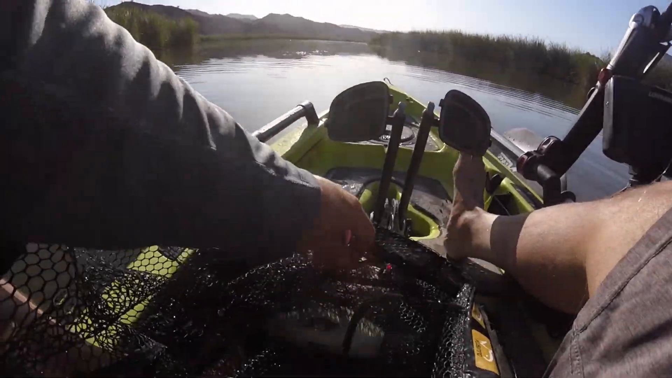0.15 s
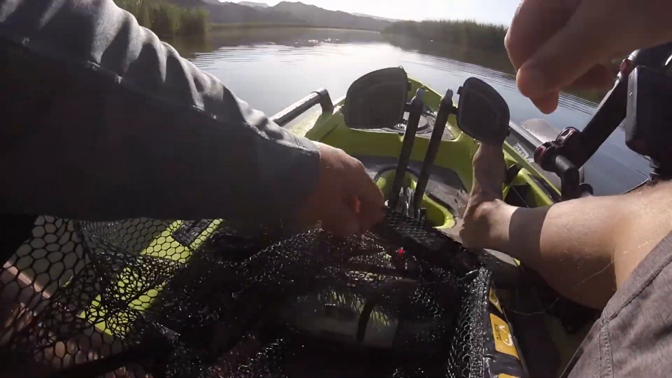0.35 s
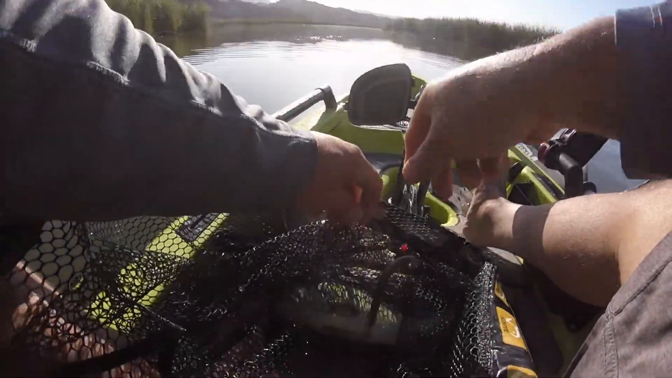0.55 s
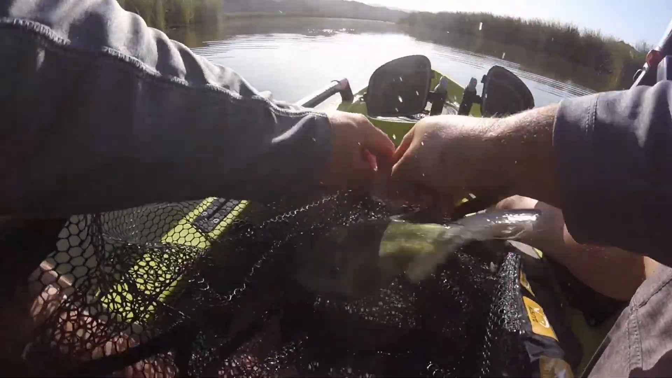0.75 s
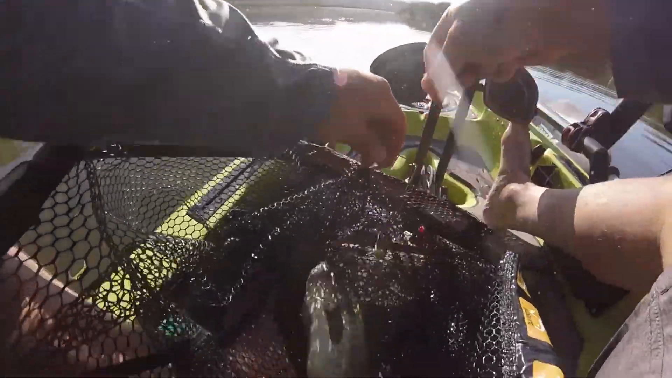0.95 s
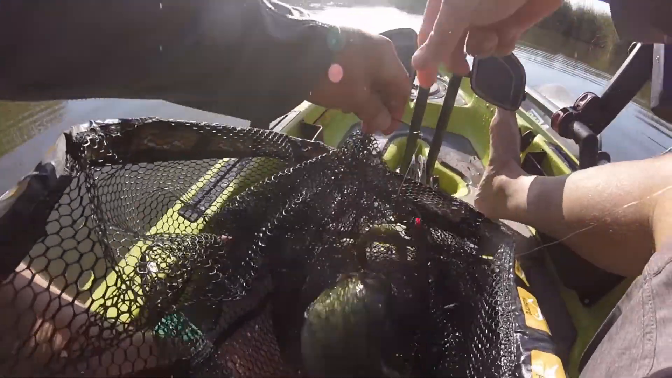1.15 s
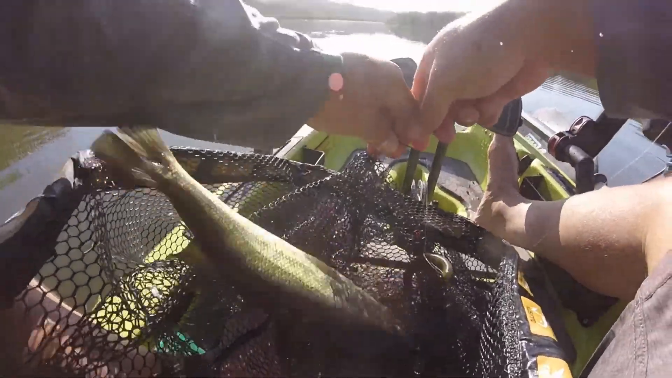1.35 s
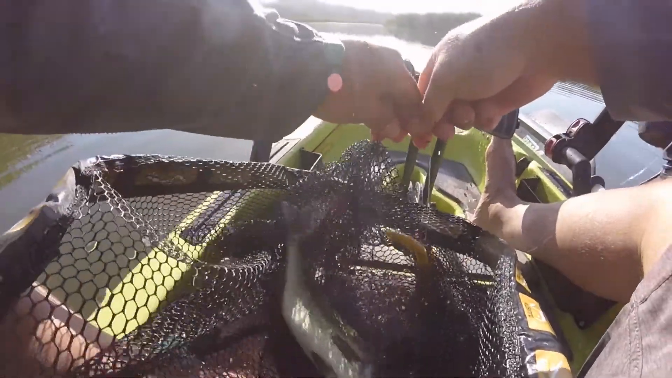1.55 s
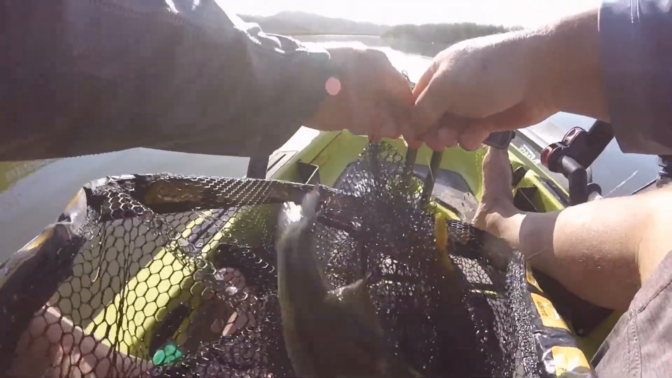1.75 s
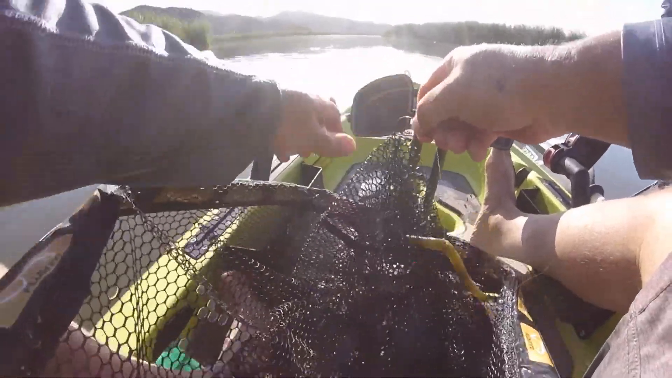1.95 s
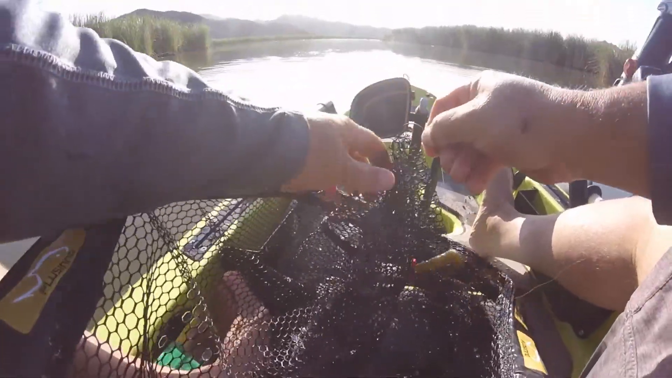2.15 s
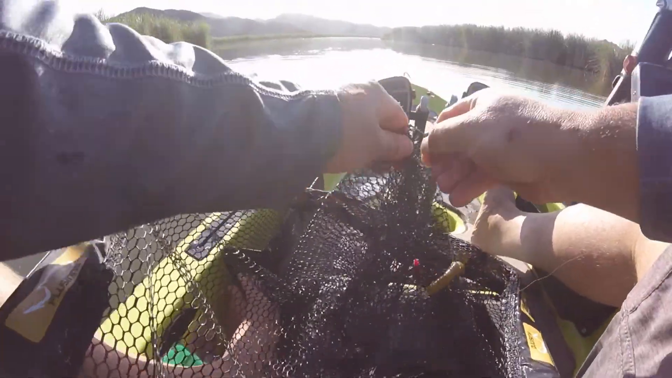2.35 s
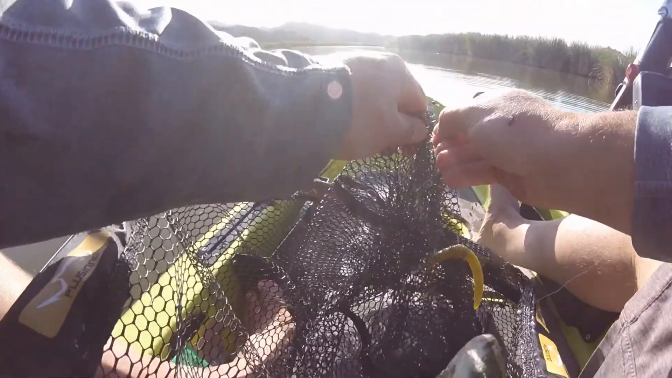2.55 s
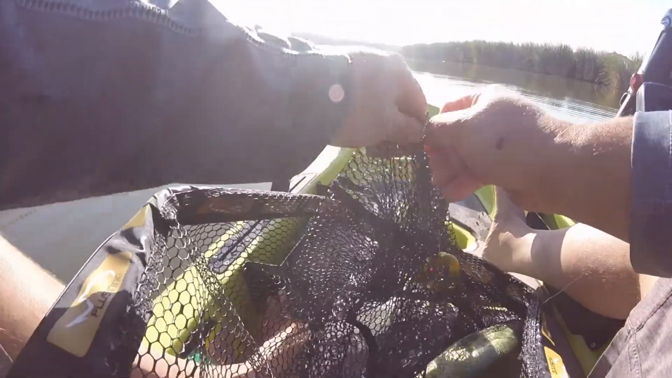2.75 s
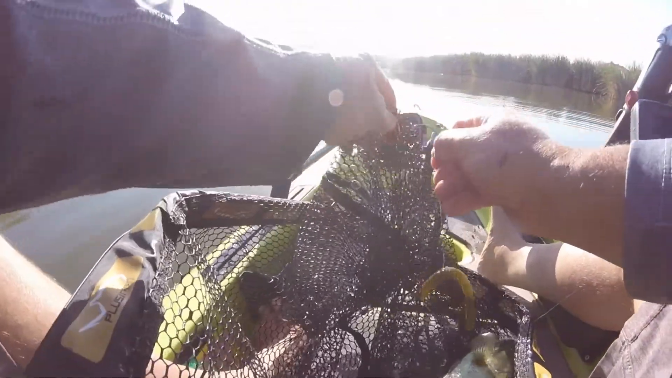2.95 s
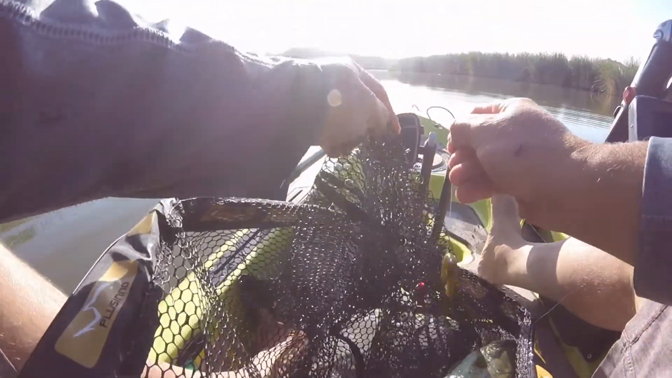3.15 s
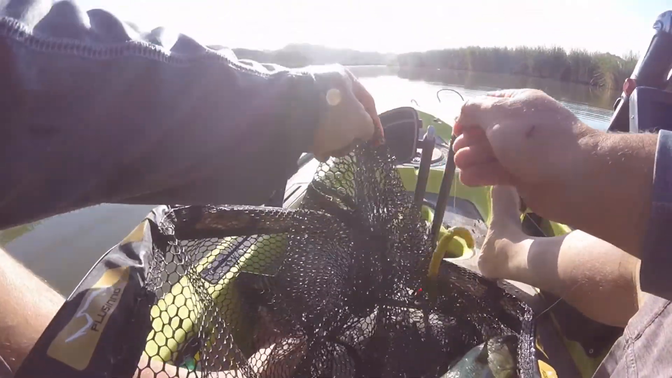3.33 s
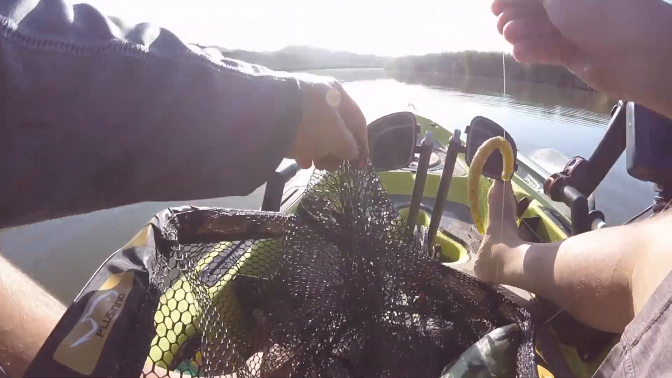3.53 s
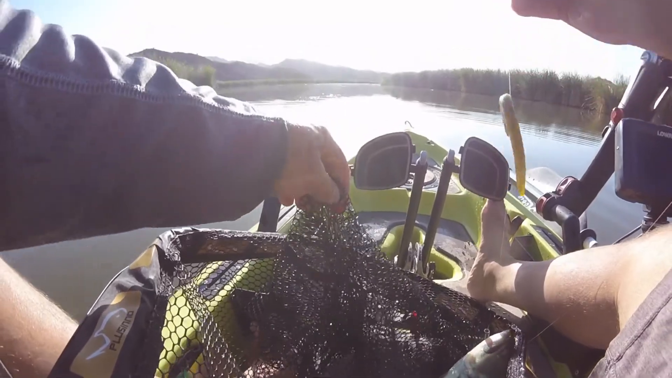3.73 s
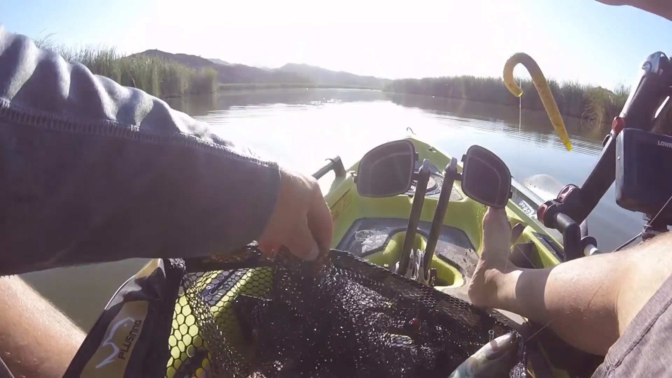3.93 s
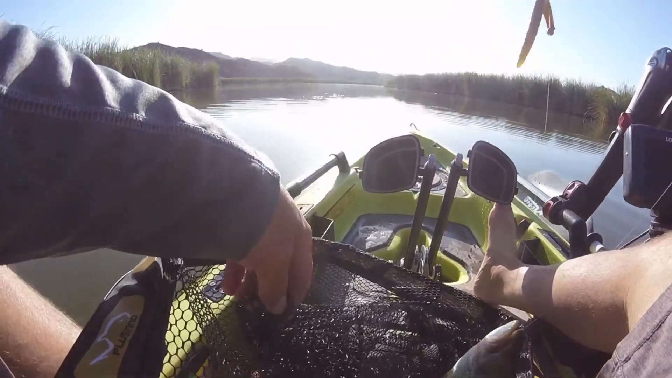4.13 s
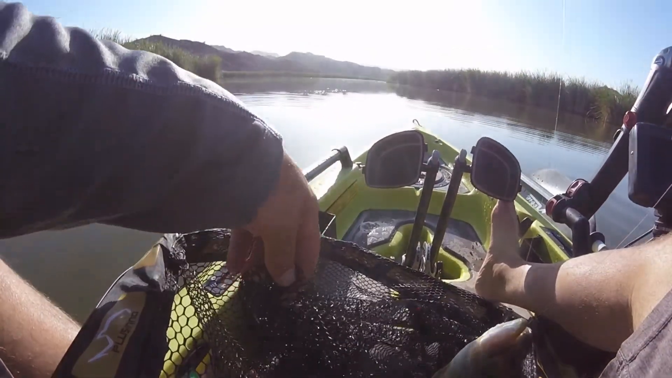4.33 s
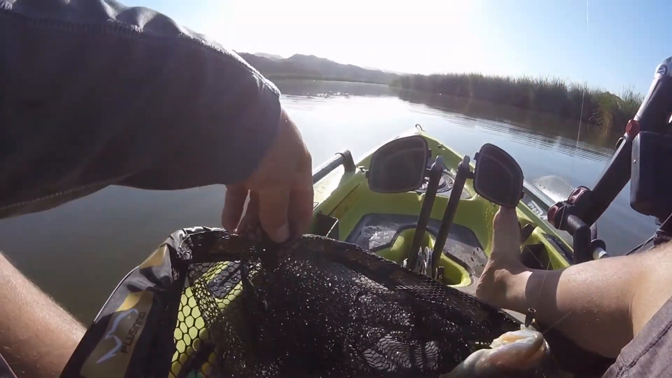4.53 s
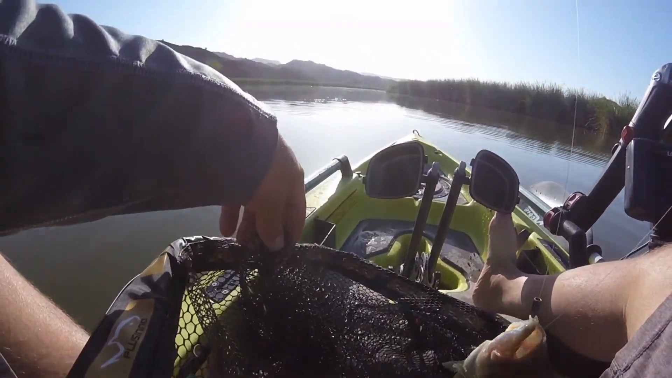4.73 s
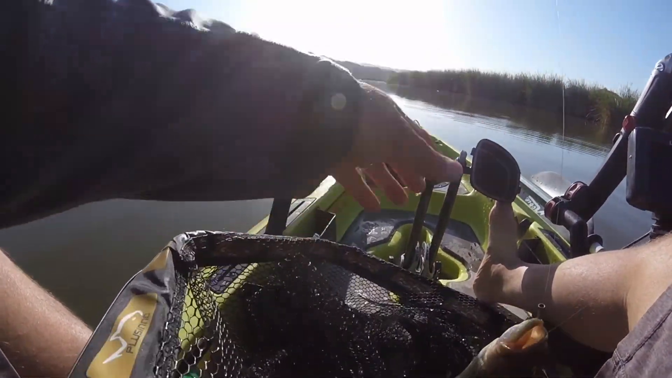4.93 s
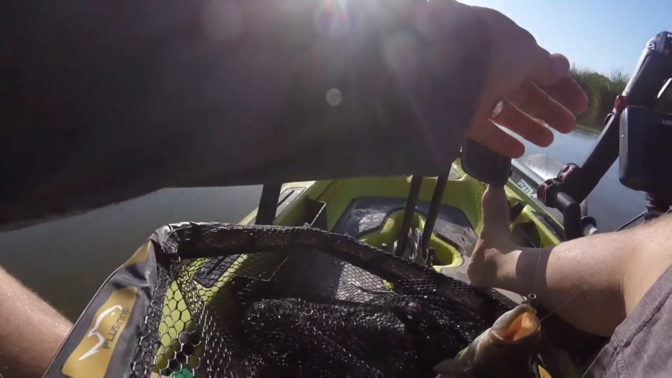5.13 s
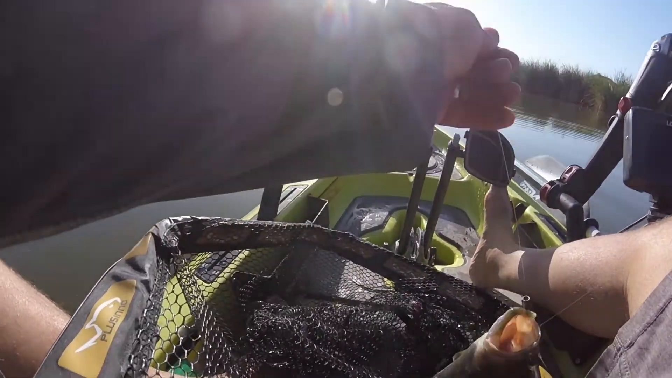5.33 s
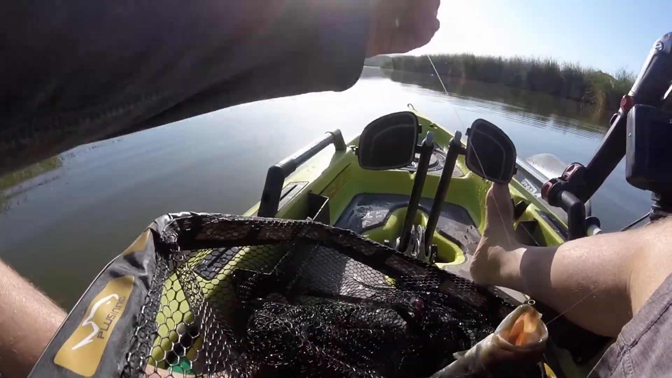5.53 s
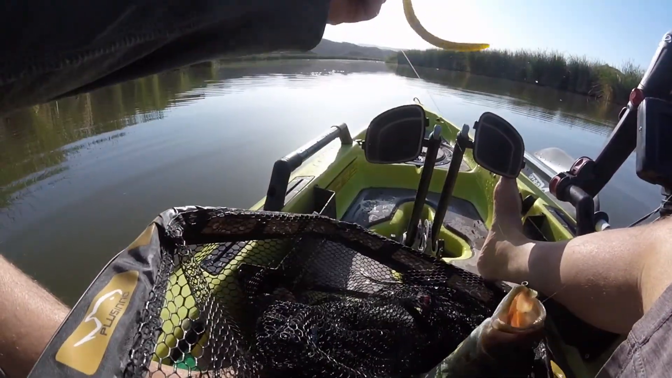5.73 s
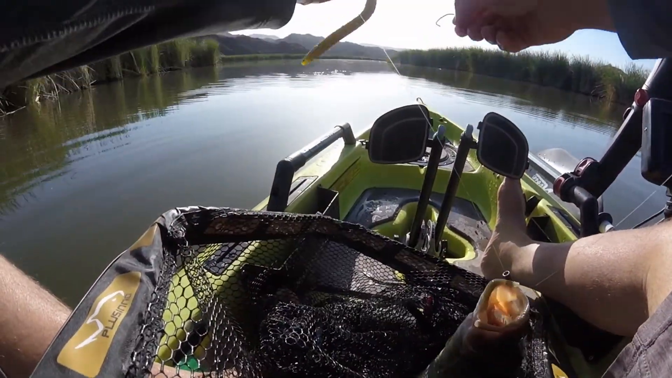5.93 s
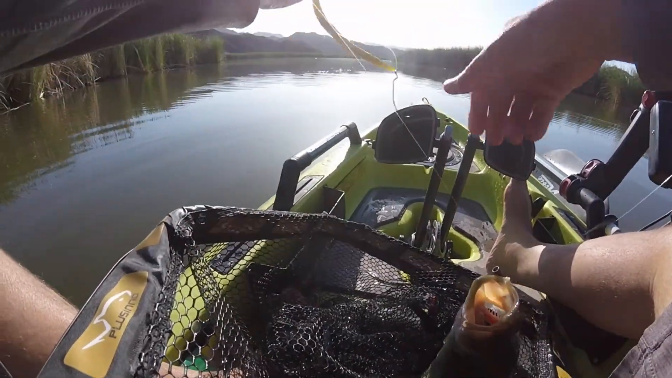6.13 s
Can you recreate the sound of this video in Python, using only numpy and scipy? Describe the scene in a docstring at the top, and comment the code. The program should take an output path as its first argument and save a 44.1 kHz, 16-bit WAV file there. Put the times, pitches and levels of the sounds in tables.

```python
"""On the floor of a plastic kayak on calm water, a fish thrashes in a landing net.
Blows and pushes ring the hull's panels and boom on the floor; the net's frame clacks as short fading tones.
Wet slaps, spray and rustling mesh are built from random clicks; small fittings tick and the frame clanks.
Wind, hiss and lapping are shaped noise or clicks, with gulps of trapped air and a very faint whine.
A camera in a waterproof case hears it all, boxy below 1 kHz and faint above."""
import sys
import numpy as np
from scipy import signal
from scipy.fft import rfft, irfft
from scipy.io import wavfile
from scipy.ndimage import uniform_filter1d

SR = 44100
rng = np.random.default_rng(int(sys.argv[2]) if len(sys.argv) > 2 else 0)


def dump_mix(stems):
    """Bounce the given channels to the path in sys.argv[1] as a 16-bit WAV at rate SR."""
    frames = np.atleast_2d(stems).T  # one column per channel
    limited = np.clip(frames, -1, 1)  # hard clip at full scale
    pcm = np.round(limited * 32767).astype(np.int16)
    wavfile.write(sys.argv[1], SR, pcm)


N = 272582
T = np.arange(N) / SR  # time in the scene, s
RING = np.arange(SR // 2) / SR  # time since a blow, s


def undb(db):
    """Turn decibels into a gain."""
    return 10 ** (np.asarray(db) / 20)


def unit(x):
    """Scale to an rms of 1."""
    return x / np.sqrt(np.mean(x ** 2))


def noise(n):
    """Plain random noise, n samples long."""
    return rng.standard_normal(n)


def burst(x, db, span):
    """Scale a short sound so that its energy, spread over span seconds, has the given level."""
    return x * undb(db) * np.sqrt(span * SR / np.sum(x ** 2))


def add(out, s, x):
    """Mix x into out from time s on."""
    i = int(s * SR)
    out[i:i + len(x)] += x[:N - i]


def colour(x, points, size=8192):
    """Filter x to the (f/Hz, level/dB) curve without pre-echo, falling 12 dB an octave above the last point."""
    hz, db = np.transpose(points)
    octave = np.log2(np.arange(size // 2 + 1) * SR / size + 1)
    above_last = np.maximum(octave - np.log2(hz[-1]), 0)
    gain = undb(np.interp(octave, np.log2(hz), db) - 12 * above_last)
    # folding the cepstrum makes the filter minimum-phase: it answers as early as it can
    cepstrum = irfft(np.log(gain))
    cepstrum[1:size // 2] *= 2
    cepstrum[size // 2 + 1:] = 0
    response = irfft(np.exp(rfft(cepstrum)))
    return signal.fftconvolve(x, response)[:len(x)]


def focus(points, hz, db_per_octave):
    """Tilt a curve down on both sides of one pitch, so that this pitch stands out."""
    return [(f, level - db_per_octave * abs(np.log2(f / hz))) for f, level in points]


def walk(rate):
    """A smooth random wander with rms 1, from random levels held 1 / rate s and averaged twice."""
    k = max(int(SR / rate), 1)
    steps = np.repeat(noise(N // k + 1), k)
    return unit(uniform_filter1d(uniform_filter1d(steps, k), k)[:N])


def grains(n, rate, spread_db):
    """Random clicks, about rate a second, of scattered sizes."""
    hit = rng.random(n) < rate / SR
    size = undb(spread_db * np.minimum(rng.exponential(size=n), 4))
    return unit(hit * noise(n) * size + 1e-12)


def ring(modes, scatter_db, detune):
    """Add up fading tones; each place of impact weights and detunes them a little."""
    hz, db, t60 = np.transpose(modes)
    chance = rng.standard_normal((2, len(hz)))
    gain = undb(db + scatter_db * chance[0])
    swing = np.sin(2 * np.pi * np.outer(hz * (1 + detune * chance[1]), RING))
    fade = np.exp(-np.log(1000) * np.outer(1 / t60, RING))
    return gain @ (swing * fade)


def stirred(blows, rise_s, fall_s):
    """Strength of a motion that builds just before each (t/s, level/dB) blow and dies away after it."""
    power = np.zeros(N)
    for s, db in blows:
        distance = np.maximum((s - T) / rise_s, (T - s) / fall_s)
        power += undb(db) ** 2 * np.exp(-2 * distance)
    return np.sqrt(power)


def stirred_by_booms(db, rise_s, fall_s):
    """Motion that follows every boom of the hull, at a level relative to the boom."""
    booms = [(s, boom_db) for s, _, _, _, boom_db, _ in THUMPS]
    return undb(db) * stirred(booms, rise_s, fall_s)


def whine():
    """The camera's electronics hold a very faint, high, steady tone."""
    return undb(-94) * unit(np.sin(2 * np.pi * 9650 * T))


# tone of the faint hiss of open air and reeds: [f/Hz, level/dB]
HISS_TONE = [(800, 5), (1500, 3.5), (2400, -2), (3000, -4.5), (3600, -6.5), (4700, -8.5), (6200, -11.5),
             (8000, -15.5), (12000, -21.5), (13500, -41), (15000, -50)]


def open_air(hiss_db=-61.0):
    """Open air and reeds give a smooth, steady hiss of shaped noise."""
    return undb(hiss_db) * unit(colour(noise(N), HISS_TONE))


# tone of the wind's rumble: [f/Hz, level/dB]
WIND_TONE = [(12, -4), (25, 8.5), (40, 3.5), (60, 6), (90, -11), (140, -4), (300, -73.5)]
# rise and fall of the wind's rumble, before the lift wind_db: [t/s, level/dB]
GUSTS = [(0.0, -48.5), (0.74, -52.5), (0.93, -39), (3.8, -44), (4.3, -42), (4.72, -41), (6.18, -45)]


def wind(wind_db=4, flutter_db=2, rock_db=-23, rock_rise_s=0.02, rock_fall_s=0.05):
    """Wind buffets the case as a deep rumble; each boom rocks the boat and adds to it."""
    gust = np.interp(T, *np.transpose(GUSTS))
    buffeting = undb(gust + wind_db + flutter_db * walk(12))
    rocking = stirred_by_booms(rock_db, rock_rise_s, rock_fall_s)
    return unit(colour(noise(N), WIND_TONE)) * np.hypot(buffeting, rocking)


# tone of the hollow inside of the case: [f/Hz, level/dB]
HOLLOW_TONE = [(300, -5.5), (520, -12), (630, -3), (720, -3), (850, 5), (940, 1), (1050, -7), (1250, -17),
               (1700, -37.5), (3000, -57.5)]
# rise and fall of the hum, before the lift hollow_db; the ripples follow it too: [t/s, level/dB]
BREEZE = [(0.0, -54), (0.81, -53), (0.95, -50), (1.31, -52.5), (2.58, -47.5), (2.84, -52), (3.79, -48),
          (4.66, -48), (5.15, -47), (5.4, -45.5), (5.89, -50.5), (6.18, -48)]


def hollow_hum(hollow_db=4.0, waver_db=0.24):
    """The open air sets the hollow of the case humming: noise shaped by its resonances."""
    air = np.interp(T, *np.transpose(BREEZE))
    return unit(colour(noise(N), HOLLOW_TONE)) * undb(air + hollow_db + waver_db * walk(14))


# tone of ripples against the hull: [f/Hz, level/dB]
LAPPING_TONE = [(50, -13.5), (80, 6.5), (140, -2.5), (205, 1.5), (300, -10.5), (420, -7), (500, -11.5),
                (700, -15.5), (1200, -73)]


def lapping(lap_db=-42, follow=0.61, slosh_db=-27.5, slosh_rise_s=0.018, slosh_fall_s=0.088):
    """Ripples pat the hull in many small clicks, swelling with the breeze; each boom stirs up more."""
    air = np.interp(T, *np.transpose(BREEZE))
    swell = air - air.mean()
    sloshing = stirred_by_booms(slosh_db, slosh_rise_s, slosh_fall_s)
    pats = grains(N, rate=900, spread_db=2.5) * undb(2 * walk(12))
    return unit(colour(pats, LAPPING_TONE)) * np.hypot(undb(lap_db + follow * swell), sloshing)


# ripples gulp in the hollows under the hull: [t/s, level/dB, starting f/Hz]
GULPS = [(0.071, -44.5, 437), (0.18, -48, 419), (3.19, -43, 413), (3.443, -38, 205), (3.559, -36, 206),
         (4.259, -55, 433), (5.4, -50, 385), (5.529, -32.5, 181), (6.112, -43, 419), (6.128, -35, 206)]


def gulps(rise_s=0.018, fall_s=0.034, glide=0.3):
    """A trapped pocket of air swells, rings and rises slightly in pitch."""
    out = np.zeros(N)
    for s, db, hz in GULPS:
        swell = (1 - np.exp(-RING / rise_s)) * np.exp(-RING / fall_s)
        swell = swell * undb(5.3 * walk(85)[:len(RING)])
        note = np.sin(2 * np.pi * hz * RING * (1 + glide * RING))
        add(out, s, burst(swell * note, db, span=0.03))
    return out


# small fittings tick, and the net's frame clanks at about 1.5 kHz when struck hard:
# [t/s, level/dB, f/Hz]
TICKS = [(1.1148, -39.5, 5170), (1.163, -50, 3560), (1.533, -30.5, 1560), (1.793, -35, 1510),
         (1.976, -33.5, 1550), (2.25, -50, 6400), (2.432, -50, 2110), (2.498, -44, 3350),
         (2.645, -52, 3500), (2.76, -31, 1520), (2.823, -48, 2750), (3.127, -47.5, 3760),
         (3.205, -42.5, 3500), (3.206, -48.5, 10700), (3.231, -51, 2540), (3.911, -61, 11600),
         (4.371, -51, 2100), (4.792, -40, 3400), (4.895, -44.5, 2270), (5.102, -43.5, 1500),
         (5.971, -60, 5550)]
# what the camera's case lets through of a sharp sound, for ticks and slaps: [f/Hz, level/dB]
CASE_TONE = [(500, -40), (900, 0), (1250, 3), (1580, 5), (2000, -6.5), (2430, 5.5), (3000, -3.5),
             (3730, 3.5), (4550, -7.5), (5600, 4), (7200, -1), (8500, -11.5), (10800, -7), (15000, -19)]


def ticks(tick_s=0.0026, focus_db=11, ring_db=-4, ring_s=0.00088):
    """Small fittings tick and the hard-struck frame clanks, each ringing for a moment around one pitch."""
    out = np.zeros(N)
    for s, db, hz in TICKS:
        contact = colour(noise(len(RING)) * np.exp(-RING / tick_s), focus(CASE_TONE, hz, focus_db))
        note = np.sin(2 * np.pi * hz * RING) * RING * np.exp(-2 * RING / ring_s)
        add(out, s, burst(unit(contact) + undb(ring_db) * unit(note), db, span=0.0019))
    return out


# tone of the wet mesh, also used for the spray: [f/Hz, level/dB]
RUSTLE_TONE = [(800, 4.5), (1600, 5.5), (2000, -2), (2450, 3), (3000, -1), (3700, 2.5), (4600, -8.5),
               (6100, -6.5), (7300, -16), (8500, -18), (11500, -22.5), (13000, -32), (15000, -52)]
# the mesh is dragged or swiped by the tail: [t/s at the height of the motion, level/dB, half length/s]
MESH_SWEEPS = [(0.304, -60, 0.056), (0.82, -59, 0.042), (1.12, -54, 0.04), (1.294, -39.5, 0.0091),
               (1.623, -56, 0.02), (1.817, -51, 0.012), (2.07, -58.5, 0.068), (2.565, -59.5, 0.13),
               (3.152, -64.5, 0.066), (3.93, -65, 0.13), (4.597, -58, 0.028), (5.0, -67.5, 0.2)]
# while the fish fights, the net is never still: [start t/s, end t/s]
STRUGGLE = (0.73, 2.75)


def mesh(struggle_db=-64.5, rest_db=-70, settle_s=0.036):
    """Wet strands slip in tiny catches, more strongly as the fish fights or the mesh is dragged or swiped."""
    begin, end = STRUGGLE
    fighting = undb(struggle_db) * np.clip(np.minimum(T - begin, end - T) / settle_s, 0, 1)
    swept = sum(undb(db) * np.exp(-.5 * ((T - s) / half_s) ** 2) for s, db, half_s in MESH_SWEEPS)
    motion = np.sqrt(fighting ** 2 + swept ** 2 + undb(rest_db) ** 2)
    crackle = grains(N, rate=2000, spread_db=-1.5) * undb(3.9 * walk(45))
    return unit(colour(crackle, RUSTLE_TONE)) * motion


def spray(bright_hz=8000, focus_db=7, flurry_db=3, rise_s=0.0086, fall_s=0.04):
    """Each slap flings fine drops off the net, which patter down in uneven, thinning flurries."""
    shower = stirred([(s, spray_db) for s, *_, spray_db in SLAPS], rise_s, fall_s)
    drops = grains(N, rate=1800, spread_db=0.5) * undb(flurry_db * walk(120))
    return unit(colour(drops, focus(RUSTLE_TONE, bright_hz, focus_db))) * shower


def pockets(low_hz=1500, high_hz=7500, ring_s=0.001997, count=16):
    """Tiny pockets of air and water are squeezed out of the mesh, each with its own brief pitch."""
    pitch, delay, size = rng.random((count, 3)).T[:, :, None]
    age = np.maximum(RING - delay * ring_s, 0)
    hz = low_hz * (high_hz / low_hz) ** pitch
    return np.sum(size * np.sin(2 * np.pi * hz * age) * np.exp(-age / ring_s), axis=0)


# wet slaps of tail and fins: [t/s, level/dB, decay/ms, brightest f/Hz, spray level/dB]
SLAPS = [(0.7572, -25, 5.6, 3080, -46), (0.9527, -33.5, 9, 2960, -52), (1.072, -47, 3.7, 4500, -63),
         (1.2593, -32.5, 8.2, 3600, -64), (1.284, -34.5, 12, 3900, -65), (1.3225, -42.5, 3.6, 4770, -75),
         (1.5315, -28.5, 3.5, 4050, -70), (1.589, -37.5, 4.3, 3600, -57), (1.764, -43.5, 16, 2800, -55),
         (1.7924, -24, 5.9, 3330, -51.5), (1.9764, -33.5, 4.5, 3400, -70), (2.186, -44, 15, 4020, -62),
         (2.202, -50, 2.5, 6000, -60), (2.3494, -44.5, 3.5, 4630, -59), (2.48, -43, 24, 2960, -74),
         (2.526, -41.5, 2.6, 3700, -59), (2.5357, -39.5, 3.5, 3970, -60.5), (2.726, -42.5, 11, 4400, -71),
         (2.7569, -33, 0.97, 4620, -79)]


def slaps(crack_db=-10, pocket_db=-9, focus_db=6, rise_s=0.00029):
    """A crack, then a dense splat of wet skin and mesh with small pockets ringing in it."""
    out = np.zeros(N)
    n = len(RING)
    for s, db, decay_ms, hz, _ in SLAPS:
        crack = unit(signal.unit_impulse(n))
        swell = (1 - np.exp(-RING / rise_s)) * np.exp(-RING / (decay_ms / 1000))
        splat = unit(grains(n, rate=10000, spread_db=6.5) * swell)
        wet = undb(crack_db) * crack + splat + undb(pocket_db) * unit(pockets())
        add(out, s, burst(colour(wet, focus(CASE_TONE, hz, focus_db)), db, span=0.0019))
    return out


# the net's frame knocks on the gunwale, the kayak's upper edge: [t/s, level/dB]
KNOCKS = [(0.954, -32.5), (0.987, -41), (1.116, -29.5), (1.121, -31.5), (1.150, -43), (1.260, -25.5),
          (1.533, -35.5), (1.538, -31.5), (1.589, -25.5), (1.793, -24.5), (1.806, -28.5), (1.825, -37),
          (1.834, -30.5), (1.840, -27.5), (1.980, -30), (2.385, -35), (2.433, -42.5), (2.530, -35),
          (2.758, -29.5), (5.022, -38.5), (5.173, -37)]
# tones of the net's frame: [f/Hz, level/dB, time to fade by 60 dB/s]
FRAME_MODES = [(448, -6.5, 0.035), (550, 0.5, 0.089), (699, -2.5, 0.11), (745, 7.5, 0.11), (804, 7, 0.04),
               (882, -2.5, 0.11), (963, -17.5, 0.28), (1433, -16, 0.11), (1526, -36, 0.031)]


def knocks(buzz_db=-5, buzz_s=0.01):
    """The net's frame gives a short hollow clack and buzzes briefly against the gunwale."""
    clack_tone = [(200, 1.0), (550, -1.5), (1000, -1.0), (1200, -6.0), (1600, -7.0), (2500, -24)]
    buzz_tone = [(300, 3), (750, 3.0), (1000, 9.5), (1200, -12.0), (1600, -15.0), (2500, -19.5)]
    out = np.zeros(N)
    for s, db in KNOCKS:
        clack = colour(unit(ring(FRAME_MODES, scatter_db=1.5, detune=.025)), clack_tone)
        buzz = colour(noise(len(RING)) * np.exp(-RING / buzz_s), buzz_tone)
        add(out, s, burst(clack + undb(buzz_db) * unit(buzz), db, span=0.017))
    return out


def boom(hz, rise_s=0.0053, fall_s=0.014, cavity_hz=84, cavity_db=-13, cavity_t60=0.61):
    """The floor swings a few times under the load; the air in the hull rings on."""
    swell = 1 - np.exp(-(RING / rise_s) ** 2)
    floor = swell * np.exp(-RING / fall_s) * np.sin(2 * np.pi * hz * RING)
    cavity_fade = np.exp(-np.log(1000) * RING / cavity_t60)
    cavity = swell * cavity_fade * np.sin(2 * np.pi * cavity_hz * RING)
    return floor / np.abs(floor).max() + undb(cavity_db) * cavity


# the fish and the dropped net bump the hull, and handling the net gives deep, soft pushes:
# [t/s, panel level/dB, contact time/ms, f/Hz favoured by the struck spot, boom level/dB, boom f/Hz]
THUMPS = [(0.048, -39, 0.73, 393, -56, 85), (0.244, -39, 2.2, 284, -40, 70),
          (0.540, -44, 0.8, 600, -49, 85), (0.679, -40, 2.1, 340, -42, 85),
          (0.7578, -11.5, 1.6, 236, -13.5, 89), (0.834, -29.5, 3.4, 200, -45, 89.4),
          (0.875, -42, 4.4, 150, -21.5, 42), (0.921, -26.5, 4.6, 151, -18, 32),
          (0.9515, -19, 0.94, 170, -25, 77.5), (1.0713, -21, 2.14, 268, -10, 82),
          (1.147, -33.5, 2.4, 240, -23, 88), (1.2593, -16, 0.66, 270, -13, 89),
          (1.286, -25.5, 0.44, 244, -27, 79), (1.588, -24, 1, 670, -8, 85), (1.613, -24, 1.9, 163, -26, 84),
          (1.757, -44, 6, 170, -13.5, 87), (1.979, -28, 0.69, 200, -42, 85),
          (2.037, -20, 5.3, 136, -8, 75.7), (2.041, -17.5, 2.74, 224, -18, 77),
          (2.075, -23.5, 2.3, 343, -28, 86), (2.222, -31, 2.3, 150, -17, 75.3),
          (2.36, -43, 2.7, 127, -22.5, 103), (2.466, -34, 3.1, 149, -19.5, 85),
          (2.497, -26.5, 1.6, 276, -25, 83), (2.542, -23, 1.7, 158, -21, 85),
          (2.7255, -16.5, 2.1, 327, -5, 83), (2.757, -13, 1.16, 710, -10.5, 84),
          (2.7611, -14.5, 1.45, 385, -42, 84), (4.891, -17.5, 1.76, 245, -19, 94),
          (4.898, -28, 0.41, 400, -32, 69.6), (4.916, -27, 0.84, 213, -32, 75),
          (4.949, -27, 2, 220, -27, 76), (4.999, -29.5, 1.6, 208, -39, 66),
          (5.025, -32.5, 0.52, 457, -24.5, 70), (5.169, -36, 0.58, 650, -29.5, 82),
          (5.274, -38, 3.6, 140, -37, 80)]
# tones of the hull's panels: [f/Hz, level/dB, time to fade by 60 dB/s]
HULL_MODES = [(127.3, 3, 0.087), (162.5, -1, 0.11), (192.5, 4, 0.089), (255.4, -4.5, 0.13),
              (293.7, -3, 0.13), (356.5, -5.5, 0.1), (401, 4, 0.055), (571, -1.5, 0.11), (634.6, 14, 0.024),
              (715, -12.5, 0.034), (795, 1, 0.082), (906, -23.5, 0.02)]
# the panels give off little bass, and the case muffles their treble: [f/Hz, level/dB]
MUFFLE_TONE = [(30, -20), (70, -10.5), (130, 3.5), (750, 3.5), (930, 7.5), (1080, -1), (1400, -17.5),
               (2500, -54), (5000, -61)]


def thumps(rattle_db=-7, rattle_s=0.012, tail_db=-19, tail_s=0.083, spot_db=7, spot_octaves=0.3):
    """Each blow or push rings the panels and shakes loose gear; a longer contact dulls the higher tones."""
    rattle_tone = [(70, -36.5), (150, 1.5), (300, 0), (900, -2.0), (2000, -10.0)]
    out = np.zeros(N)
    for s, panel_db, contact_ms, spot_hz, boom_db, boom_hz in THUMPS:
        modes = []
        for f, level, t60 in HULL_MODES:
            closeness = np.exp(-(np.log2(f / spot_hz) / spot_octaves) ** 2)
            modes.append((f, level + spot_db * closeness, t60))
        shake = np.exp(-RING / rattle_s) + undb(tail_db) * np.exp(-RING / tail_s)
        rattle = colour(noise(len(RING)) * shake, rattle_tone)
        struck = unit(ring(modes, scatter_db=1.5, detune=0.05)) + undb(rattle_db) * unit(rattle)
        # the force of the contact is a smooth bump, longer for a softer one
        age = RING * 1000 / contact_ms
        push = age * np.exp(-4 * age)
        panels = colour(signal.fftconvolve(struck, push)[:len(RING)], MUFFLE_TONE)
        add(out, s, burst(panels, panel_db, span=0.014) + undb(boom_db) * boom(boom_hz))
    return out


def scene():
    """Everything at the camera, in one channel."""
    background = whine() + open_air() + wind() + hollow_hum() + lapping() + gulps()
    gear = ticks() + mesh() + knocks()
    wet_and_heavy = spray() + slaps() + thumps()
    return (background + gear + wet_and_heavy)[None]


def smooth(x, s):
    """Follow x slowly, with a time constant of s seconds."""
    step = 1 / (s * SR)
    return signal.lfilter([step], [1, step - 1], x)


def record(dry, knee_db=-20, duck=0.28, attack_s=0.082, release_s=0.1, top_hz=15700):
    """The camera's slow gain control ducks a little after the loudest blows; then it cuts the top."""
    power = smooth(smooth(dry ** 2, attack_s), release_s)
    gain = (1 + power / undb(knee_db) ** 2) ** (-duck / 2)
    top_cut = signal.ellip(8, .2, 70, top_hz, fs=SR, output="sos")
    return signal.sosfilt(top_cut, dry * gain)


dry = scene()
out = record(dry)
dump_mix(out)
```